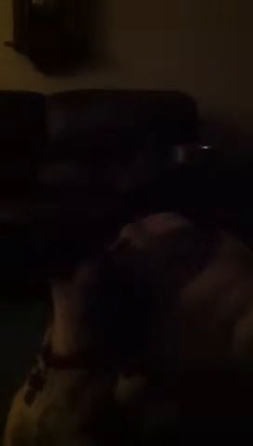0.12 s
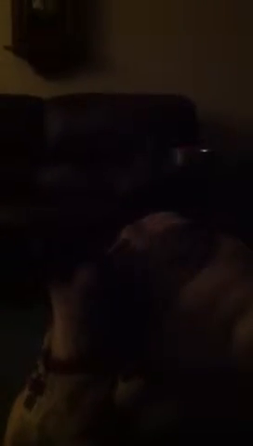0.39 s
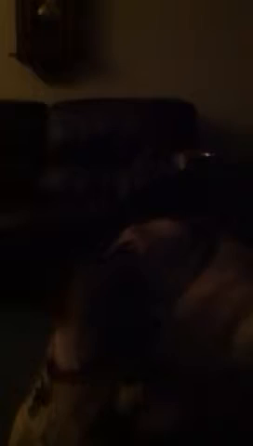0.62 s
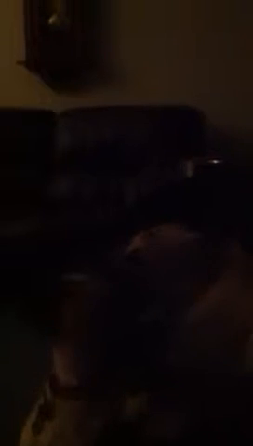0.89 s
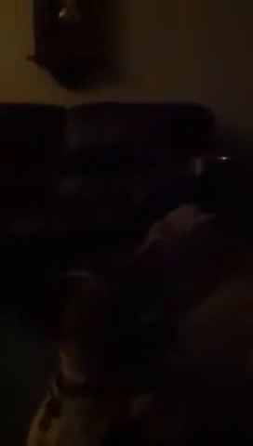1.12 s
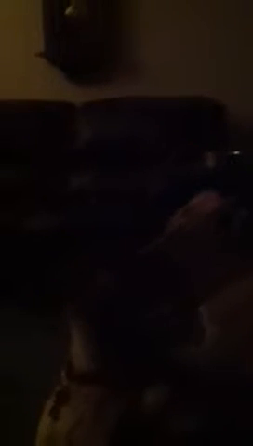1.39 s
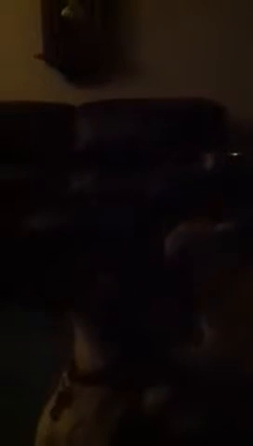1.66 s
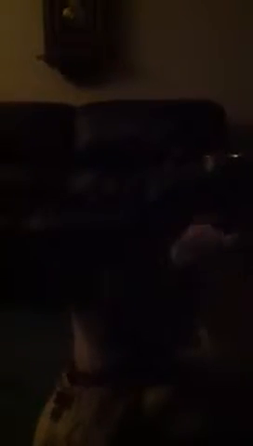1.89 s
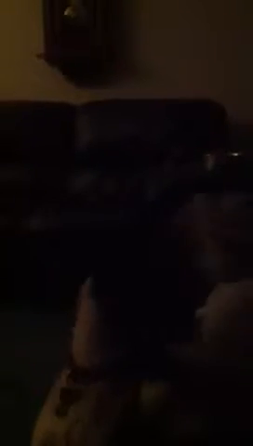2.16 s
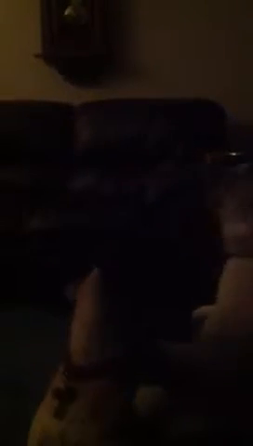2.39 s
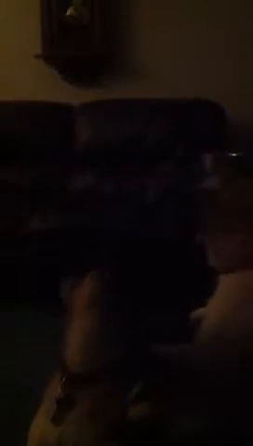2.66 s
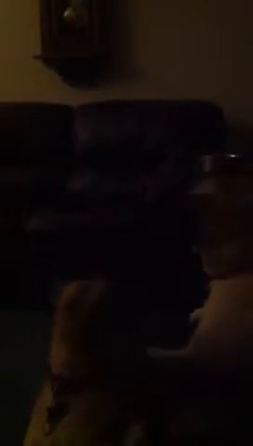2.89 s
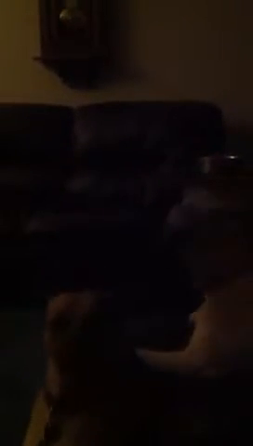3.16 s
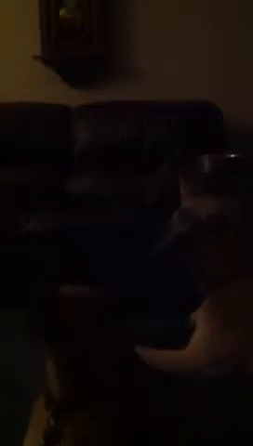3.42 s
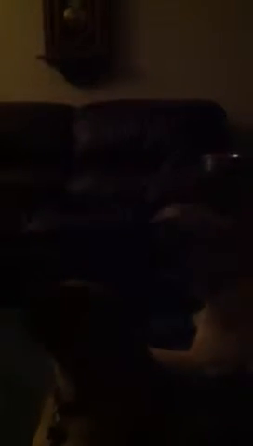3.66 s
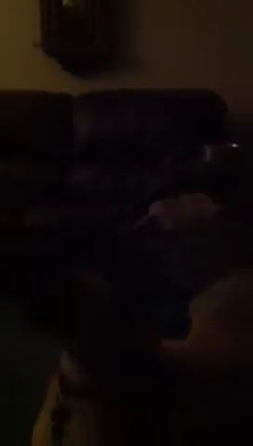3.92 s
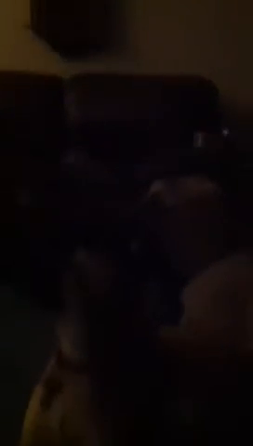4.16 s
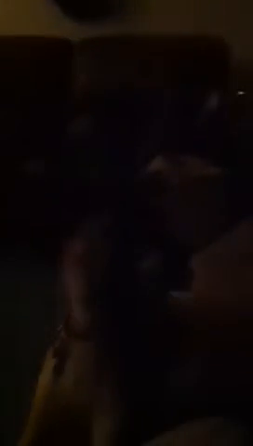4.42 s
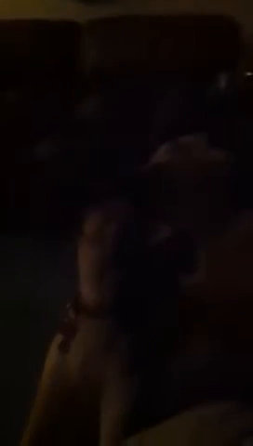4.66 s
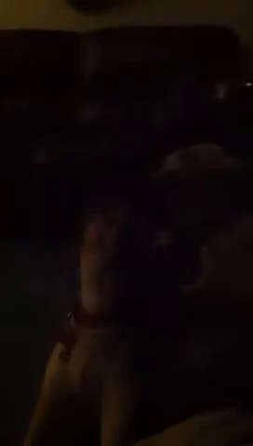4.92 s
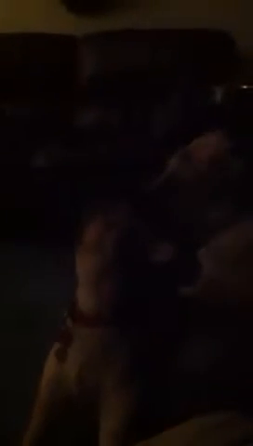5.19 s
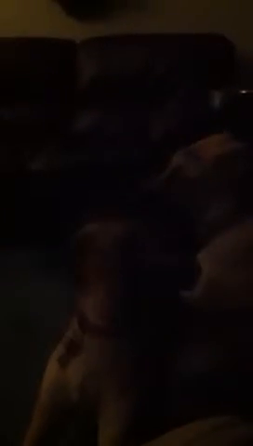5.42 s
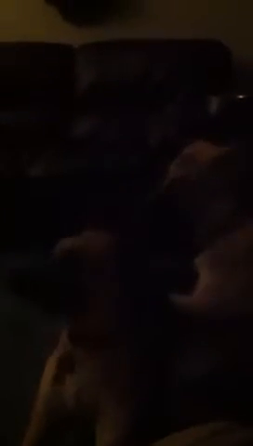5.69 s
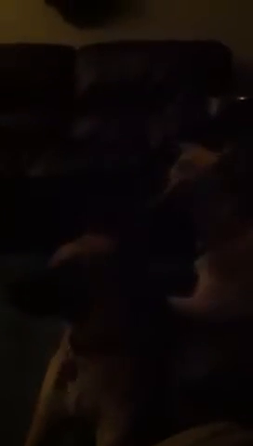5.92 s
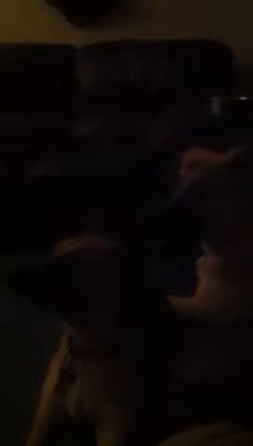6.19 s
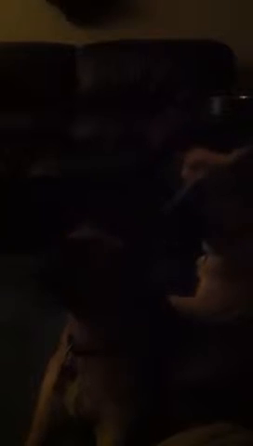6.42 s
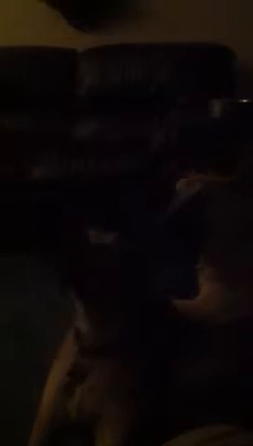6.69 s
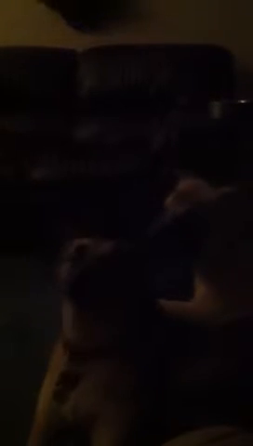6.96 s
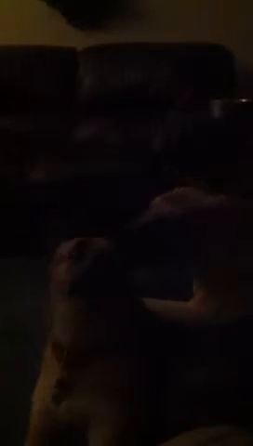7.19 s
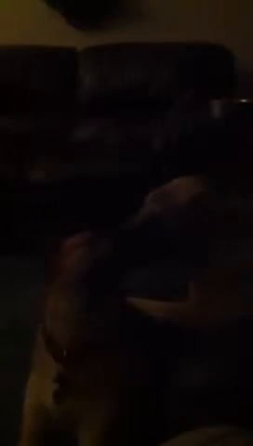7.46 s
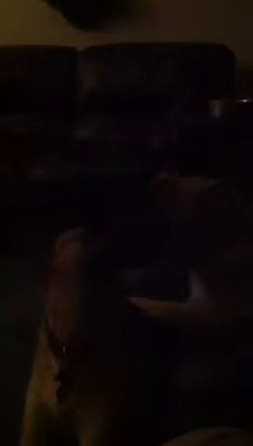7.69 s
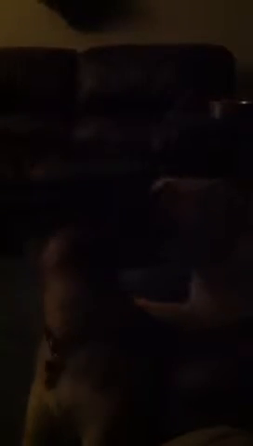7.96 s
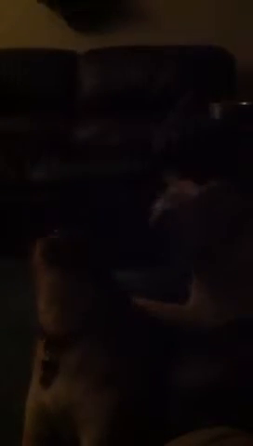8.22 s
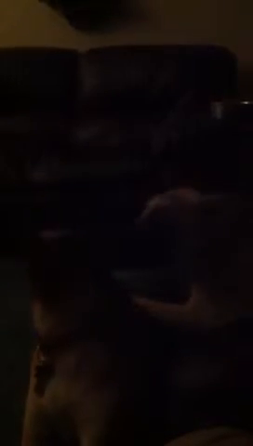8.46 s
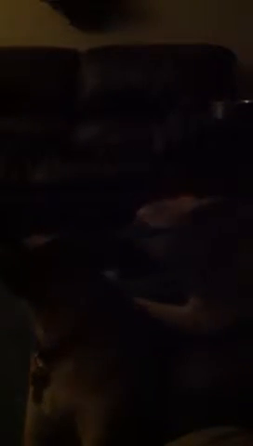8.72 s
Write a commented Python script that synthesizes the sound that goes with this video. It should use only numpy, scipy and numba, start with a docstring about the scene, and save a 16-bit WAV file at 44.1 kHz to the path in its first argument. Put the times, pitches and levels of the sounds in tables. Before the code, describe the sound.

Three dogs vocalise in a small furnished living room, a step or two from the microphone, with a short room ring, faint low house murmur and slight hiss. At 0 s a clear, steady howl is already sounding and slides down until about 1 s, with soft low moans beneath and a hoarse bark near 0.7 s; a faint dry tick comes around 0.9 s. From 1.35 to 2.5 s strong yelps scoop up and fall, interleaved with rough barks. From 3 to 4.9 s short, bright yelps and husky barks come in overlapping bursts, with small gaps. From 5.2 to 6.6 s yelps alternate with low sinking moans. At about 6.2 s a second, softer howl enters and wavers in loudness as it descends, fading by 8.5 s. Clipped barks punctuate it from 6.7 s, and yelps with moans return from 8.2 s to the end.

```python
"""Three dogs sing together in a small furnished living room, a step or two from the microphone.
One holds long falling howls, one yelps up and drops into low moans, one barks hoarsely among them.
Each voice is a stack of partials on an unsteady pitch, plus breath noise puffed once a cycle.
Fading noise makes the room's short ring; shaped noise makes a low house murmur, a tick and a hiss.
A limiter holds down the peaks."""
import sys
import numpy as np
from scipy import signal
from scipy.fft import rfft, irfft, next_fast_len
from scipy.io import wavfile
from scipy.ndimage import uniform_filter1d, minimum_filter1d
from numba import njit

SR = 44100
rng = np.random.default_rng(int(sys.argv[2]) if len(sys.argv) > 2 else 0)


def volts_from_db(level):
    """Convert decibel levels to linear amplitude ratios."""
    exponent = np.asarray(level, float) / 20
    return 10 ** exponent


def wav_out(sig):
    """Save sig, one row per channel (or a flat mono array), as 16-bit PCM at SR to the path in sys.argv[1]."""
    wavfile.write(sys.argv[1], SR, np.round(np.clip(np.atleast_2d(sig).T, -1, 1) * 32767).astype(np.int16))


N = 389838
T = np.arange(N) / SR  # time in seconds


def colour(points, hz):
    """Reads a table of f/Hz, level/dB at any frequency, along a logarithmic pitch scale."""
    f, db = np.transpose(points)
    return np.interp(np.log(np.maximum(hz, 1)), np.log(f), db)


def shaped(x, points):
    """Filters a sound by a table of f/Hz, level/dB."""
    size = next_fast_len(len(x))
    gain = volts_from_db(colour(points, np.fft.rfftfreq(size, 1 / SR)))
    return irfft(rfft(x, size) * gain, size)[:len(x)]


def walk(rate, size):
    """Random levels, rate of them a second, joined by straight lines."""
    count = int(size * rate / SR) + 2
    return np.interp(np.arange(size) * rate / SR, np.arange(count), rng.standard_normal(count))


@njit
def peak_hold(x, release):
    """Jumps to each peak at once and creeps back down."""
    held, level = np.empty(len(x)), 0.
    for i in range(len(x)):
        level = max(abs(x[i]), level * release)
        held[i] = level
    return held


def limiter(x):
    """Turns the sound down around its peaks, starting about a millisecond ahead of them."""
    ceiling, release_s = .7, 0.013  # ceiling as a share of full scale
    peaks = peak_hold(x, np.exp(-1 / (release_s * SR)))
    gain = np.minimum(1, ceiling / (peaks + 1e-9))
    return x * uniform_filter1d(minimum_filter1d(gain, size=65), size=33)


def hiss():
    """Steady faint hiss of the microphone: shaped noise."""
    x = shaped(rng.standard_normal(N), [(1500, -3.5), (4000, 3), (8000, 4.5), (12000, 1), (16000, -9.0)])
    return volts_from_db(-73.5) * x / x.std()


# how the house murmur spreads over pitch: (f/Hz, relative level/dB per Hz)
HOUSE_COLOUR = [(35, -69.5), (60, -27), (209, -17.5), (326, -22.5), (360, -4), (629, -20), (981, -17.5),
                (3050, -43), (3960, -69), (6710, -120)]


def house():
    """A faint low murmur of the house: shaped noise whose level flickers."""
    x = shaped(rng.standard_normal(N), HOUSE_COLOUR) * volts_from_db(2 * walk(41, N))
    return volts_from_db(-56) * x / x.std()


# the tick: (t/s, level/dB before its colouring)
TICK_EVENT = (.928, -38)


def tick():
    """One faint dry tick, perhaps a collar tag: a burst of noise that dies within milliseconds."""
    s, level_db = TICK_EVENT
    burst = rng.standard_normal(N) * np.exp(-np.maximum(T - s, 0) / 0.0016) * (T >= s)
    return volts_from_db(level_db) * shaped(burst, [(1200, -39), (3000, 13), (7000, -2), (16000, -21.0)])


# how long the room rings in each band: (middle f/Hz, time to fall by 60 dB t/s)
ROOM_RING = [(250, 0.57), (550, 0.39), (1200, 0.52), (2500, 0.38), (5000, 0.3), (10000, 0.55)]


def room(x, wet_db, delay_s=0.0019):
    """The direct sound plus its reflections: a noise tail in bands, each dying at its own pace."""
    t = T[:int(.9 * SR)]
    tail = 0
    for hz, t60 in ROOM_RING:
        sos = signal.butter(2, [hz / 1.5, hz * 1.5], "bandpass", fs=SR, output="sos")
        tail = tail + signal.sosfilt(sos, rng.standard_normal(len(t))) * 1000. ** (-t / t60)
    tail = tail * np.clip(t / delay_s - 1, 0, 1)  # silent up to the delay, full at twice the delay
    tail = tail / np.sqrt(np.sum(tail ** 2))
    return x + volts_from_db(wet_db) * signal.fftconvolve(x, tail)[:N]


# the largest share of a call that its rise may take: (a single number, no unit)
LONGEST_RISE_SHARE = .7


def arch(event, move, fade, mouth):
    """A call scoops up to its top pitch as it swells, holds, then slides to its last pitch as it fades."""
    start, length, top_hz, last_hz, db = event
    scoop, rise_s, attack_db, slide = move
    fade_db, open_db = fade
    t = np.linspace(0, length, num=int(length * 400) + 2)
    # a short call rises sooner and from less far below
    hurry = min(1, LONGEST_RISE_SHARE * length / rise_s)
    rise_s, scoop = hurry * rise_s, hurry * scoop
    missing = np.clip(1 - t / rise_s, 0, 1) ** 2
    turn_s = max(rise_s, length - abs(top_hz - last_hz) / slide - 1e-3)
    hz = np.interp(t, [turn_s, length], [top_hz, last_hz]) * (1 - scoop * missing)
    after = np.maximum(t - rise_s, 0)
    level_db = db + attack_db * missing + fade_db * after
    mouth_db = np.interp(start + t, *np.transpose(mouth)) + open_db * after
    return np.transpose([start + t, hz, level_db, mouth_db])


# colour of the air hissing past the teeth: (f/Hz, relative level/dB)
TEETH_AIR = [(2000, -27.5), (3300, -0.5), (4300, -8), (5600, 3.5), (8000, -4), (12000, -20), (16000, -24.5)]


def voice(call, jaw, throat, rough, halves, lead, breath_db, air_db, edge_s, waver_db, snap_db, wobble, ring):
    """One call: partials on a jittered pitch, each with its own shimmer, plus breath puffed once a cycle."""
    s, *columns = np.transpose(call)
    i0, i1 = int(s[0] * SR), min(int(s[-1] * SR), N)
    t, size = T[i0:i1], i1 - i0
    hz, level_db, open_db = (np.interp(t, s, c) for c in columns)
    most, rough, halves = rough.max(), rough[i0:i1], halves[i0:i1]

    # the jaw colours the three lowest partials; a wider mouth lifts those from the first lead one up
    low_db = [level_db + open_db * (k >= lead[0]) + colour(jaw, k * hz) for k in (1, 2, 3)]
    # the strongest lead partial, without the throat's colour, is the effort of the vocal folds
    effort_db = np.max([low_db[k - 1] - colour(throat, k * hz) for k in lead], axis=0)

    jitter = .16 * rough * walk(420, size) + wobble * walk(35, size)
    phase = 2 * np.pi * (rng.random() + np.cumsum(hz * (1 + jitter)) / SR)
    # every second cycle weaker: lines appear halfway between the upper partials
    limp = 1 + halves * np.cos(phase / 2)
    # folds that close cleanly snap shut harder and ring brighter
    snap = -snap_db * np.log10(rough / most) + np.interp(t, *np.transpose(ring))

    out = 0
    for k in range(1, int(15500 / hz.max())):
        if k <= 3:
            db = low_db[k - 1] + waver_db * np.sqrt(k) * walk(25, size)
        else:
            # the moving jaw and tongue let each upper partial swell and fade alone
            swell_db = min(2 * k - 6, 6) * walk(12, size)
            db = effort_db + snap * (k > 5) + colour(throat, k * hz) + swell_db
        shimmer = (1 + 1.36 * rough * walk(260, size)) * (limp if k > 1 else 1)
        out = out + np.sqrt(2) * volts_from_db(db) * shimmer * np.sin(k * phase - .4 * k * k)

    puff = rng.standard_normal(size) * (1 + np.cos(phase))
    puff = shaped(puff, [(200, -50), (500, 4.0)] + throat)
    # air hissing past the teeth is brighter than the voice
    air = shaped(rng.standard_normal(size) * (1 + np.cos(phase)), TEETH_AIR)
    # folds that close unevenly leak more air
    leak = np.sqrt(rough / most)
    breath = volts_from_db(breath_db) * puff / puff.std() + volts_from_db(air_db) * air / air.std()
    out = out + leak * volts_from_db(effort_db) * breath

    # soft edges, except where the scene itself begins or ends
    from_start = (t - s[0]) if i0 else 1
    to_end = (s[-1] - t) if i1 < N - 99 else 1
    return i0, i1, out * np.clip(np.minimum(from_start, to_end) / edge_s, 0, 1)


def dog(calls, *voicing, **more):
    """Adds up all the calls of one dog."""
    out = np.zeros(N)
    for call in calls:
        i0, i1, sound = voice(call, *voicing, **more)
        out[i0:i1] += sound
    return out


# barks: (start t/s, length t/s, top f/Hz, last f/Hz, level/dB before the jaw's colour)
BARK_CALLS = [(0.681, 0.13, 547.7, 507, -10), (1.552, 0.12, 569, 448, -14.5),
              (1.951, .12, 585, 481.5, -11.5), (2.442, 0.087, 638.4, 641.6, -10),
              (3.002, .12, 512.6, 507, -16), (3.566, .165, 525.7, 520, -11),
              (4.248, 0.085, 621.4, 670, -25.5), (4.354, .125, 579.4, 472.4, -19),
              (4.785, 0.11, 548.5, 497, -20), (6.673, 0.098, 713.7, 678, -12),
              (7.122, 0.085, 586.6, 492, -14.5), (7.7, 0.074, 652, 620, -10),
              (8.233, 0.044, 549.6, 522, -16), (8.508, 0.083, 552, 513.5, -17.5),
              (8.815, 0.064, 581, 610, -21)]
# where each bark's voice breaks: (t/s, added roughness 0-1, added strong-weak cycles 0-1)
VOICE_BREAKS = [(.72, .45, .4), (1.59, .4, .3), (1.99, .22, .3), (2.46, .06, .8), (3.02, .2, .2),
                (3.59, .35, .3), (4.25, .3, .2), (4.37, .3, .4), (4.81, .14, .2), (6.715, .1, .8),
                (7.15, .07, .3), (7.72, .05, .7), (8.25, .15, .2), (8.54, .25, .3), (8.82, .2, .2)]
# jaw and lip colour of the three lowest partials: (f/Hz, level/dB)
BARK_JAW_COLOUR = [(450, -12.5), (550, -4.5), (680, 2), (950, -6.5), (1100, -4), (1300, -11.5),
                   (1600, -12.5), (1900, -11), (2150, -13.5)]
# throat and mouth colour of the upper partials: (f/Hz, level/dB)
BARK_THROAT_COLOUR = [(1000, 5.5), (1700, -10), (2200, -7), (2800, -31.5), (3400, -43), (4100, -37.5),
                      (5400, -34), (7500, -43), (10000, -54.5), (16000, -59)]
# how a bark moves: (scoop from below 0-1, longest rise t/s, attack level/dB, closing slide Hz per s)
BARK_MOTION = (.15, .035, -26, 3500)
# how a bark changes after its rise: (fade dB per s, mouth opening dB per s)
BARK_DECAY = (-220, 156)
# how wide the mouth is held: (t/s, level/dB on the overtones)
BARK_OPENING = [(0.751, -5), (1.599, 4.5), (2.001, 1), (2.5, -3.5), (3.05, 4.5), (3.649, -3.5), (4.4, 5.5),
                (4.848, 5.5), (6.751, 5.5), (7.181, 4.5), (7.751, 3), (8.28, 5.5), (8.56, 3)]
# how brightly the partials above the fifth ring: (t/s, level/dB)
BARK_BRIGHTNESS = [(.7, -1.9), (2.5, -0.14), (4.8, -2.2), (6.7, -0.86), (7.2, -0.51), (7.75, -0.82),
                   (8.5, 1)]


def barker():
    """Hoarse barks: in each one the folds fall out of step, which roughens the voice."""
    rough, halves = np.full(N, .04), np.zeros(N)
    for s, more_rough, more_halves in VOICE_BREAKS:
        held = np.clip((T - s) / .012, 0, 1) * (T < s + .17)
        rough, halves = rough + more_rough * held, halves + more_halves * held
    calls = [arch(e, BARK_MOTION, BARK_DECAY, BARK_OPENING) for e in BARK_CALLS]
    return dog(calls, BARK_JAW_COLOUR, BARK_THROAT_COLOUR, rough, halves, (2, 3),
               breath_db=-0.5, air_db=-43.5, edge_s=0.0018, waver_db=3.5,
               snap_db=0, wobble=.009, ring=BARK_BRIGHTNESS)


# yelps: (start t/s, length t/s, top f/Hz, last f/Hz, level/dB before the jaw's colour)
YELP_CALLS = [(1.355, 0.2, 558.6, 494.7, -6), (1.69, 0.27, 563.2, 419, -8), (2.26, 0.25, 570.2, 468.6, -4),
              (2.98, 0.046, 619.3, 617, -4.5), (3.29, 0.13, 623.4, 643, -3.5),
              (3.583, 0.14, 639.4, 663, -6.5), (3.9, 0.21, 588.3, 497.4, -10),
              (4.259, 0.14, 596.7, 623, -6), (4.76, 0.057, 624, 630, -7), (5.247, 0.13, 610, 610, -3.5),
              (5.65, 0.14, 589, 563, -9), (6.052, 0.14, 586, 541.7, -5.5), (6.415, .22, 574.3, 443, -11),
              (8.235, 0.13, 614.3, 597, -14), (8.515, .14, 620, 578, -8.5)]
# softer moans: (start t/s, length t/s, first f/Hz, last f/Hz, level/dB before the jaw's colour)
MOAN_CALLS = [(0.0, 0.16, 430.6, 420, -20), (.105, .2, 500.6, 441, -22.5), (.308, .077, 428, 431, -15),
              (.388, 0.22, 480.4, 436.6, -23), (2.03, .24, 524, 559.3, -17), (3.417, .153, 456.5, 410, -19),
              (3.735, 0.18, 460.5, 462, -25.5), (5.397, 0.23, 452, 413, -28),
              (5.807, .245, 436.5, 367, -25.5), (6.197, .225, 462.2, 381.6, -22.5),
              (4.135, .115, 501, 427, -35.5), (6.637, .065, 452.3, 412, -29),
              (8.363, 0.14, 574, 521.6, -22.5), (8.656, 0.15, 601.3, 534, -21.5)]
# the clearest notes: (start t/s, end t/s)
CLEAR_NOTES = [(.1, .3), (.39, .68), (1.42, 1.5), (2.3, 2.46), (3.33, 3.52), (5.95, 6.06), (8.26, 8.42),
               (8.58, 8.75)]
# jaw and lip colour of the three lowest partials: (f/Hz, level/dB)
YELP_JAW_COLOUR = [(380, -4), (450, -6.5), (520, 0), (600, -4), (850, -4), (980, 1), (1150, -20),
                   (1300, -17), (1500, -8.5), (1750, -10), (1950, -16)]
# throat and mouth colour of the upper partials: (f/Hz, level/dB)
YELP_THROAT_COLOUR = [(1000, -5), (1800, 9.5), (2300, -8.5), (2800, -19.5), (3300, -47), (4300, -27),
                      (5600, -28), (7500, -33.5), (10000, -50), (16000, -56)]
# how each call moves: (scoop from below 0-1, longest rise t/s, attack level/dB, closing slide Hz per s)
YELP_MOTION = (.31, .09, -30, 1300)
MOAN_MOTION = (.02, .025, -14, 10)
# how each call changes after its rise: (fade dB per s, mouth opening dB per s)
YELP_DECAY = (-87, 30)
MOAN_DECAY = (-48.5, -11)
# how wide the mouth is held: (t/s, level/dB on the overtones)
YELP_OPENING = [(0, -22), (0.701, -11.5), (1.4, -2.5), (1.8, -5), (2.15, 0.5), (2.38, -3), (2.998, 3),
                (3.35, 1.5), (3.5, 0.5), (3.65, 4), (4.0, -0.5), (4.35, -1), (4.8, 3), (5.302, -1.5),
                (5.5, 5.5), (5.75, 3), (5.95, 3), (6.13, -1.5), (6.3, 7), (6.5, 0), (8.299, 4), (8.6, -0.5)]
# how brightly the partials above the fifth ring: (t/s, level/dB)
YELP_BRIGHTNESS = [(0, -2.5), (1.45, -3.5), (1.8, 6.5), (2.35, 1), (3.38, -1), (4.0, -0.5), (5.3, 0),
                   (5.75, 2.5), (6.0, -3), (6.5, 1), (8.3, 3), (8.7, 5)]


def yelper():
    """Yelps and moans from slightly hoarse folds, which close cleanly on a few clear notes."""
    rough = np.full(N, .12)
    for start, end in CLEAR_NOTES:
        rough[int(start * SR):int(end * SR)] = .015
    yelps = [arch(e, YELP_MOTION, YELP_DECAY, YELP_OPENING) for e in YELP_CALLS]
    moans = [arch(e, MOAN_MOTION, MOAN_DECAY, YELP_OPENING) for e in MOAN_CALLS]
    return dog(yelps + moans, YELP_JAW_COLOUR, YELP_THROAT_COLOUR, rough, np.zeros(N), (3,),
               breath_db=-10.5, air_db=-21.0, edge_s=0.0034, waver_db=2.5,
               snap_db=8, wobble=.006, ring=YELP_BRIGHTNESS)


# howls, one list each: (t/s, f/Hz, level/dB before the jaw's colour, mouth opening level/dB on overtones)
HOWL_CALLS = [
    [(0.0, 699.7, -10.5, 1.5), (0.04, 680, -11, -1), (0.1, 665, -9, 1), (0.17, 645, -13.5, 1.5),
     (0.3, 619.2, -12.5, -0.5), (0.4, 603, -9.5, -5), (0.52, 585, -14.5, -5.5), (0.62, 585.4, -10, -12.5),
     (0.68, 569, -17.5, -8.5), (0.86, 547, -29, -8), (0.93, 539.4, -20.5, -8.5), (1.03, 521, -31, -2.5)],
    [(6.17, 582.8, -28, 6), (6.25, 593, -29.5, 8), (6.35, 577, -30.5, 12), (6.42, 576.6, -14, 4),
     (6.56, 566, -27.5, -0.5), (6.66, 553, -23, 9), (6.85, 514, -32.5, 12.5), (6.97, 497, -33.5, 13.5),
     (7.1, 479.4, -21, -1), (7.32, 466, -21, -3.5), (7.45, 456, -26, 3.5), (7.57, 444, -17.5, -8),
     (7.68, 438, -18.5, -6), (7.9, 427, -24.5, -12), (8.2, 411.8, -28, 0.5), (8.35, 405, -34, 0),
     (8.47, 393, -41, -5)],
]
# jaw and lip colour of the three lowest partials: (f/Hz, level/dB)
HOWL_JAW_COLOUR = [(400, 2), (700, 0), (850, -18.5), (1100, -10.5), (1350, -13.5), (1500, -6),
                   (1750, -23.5), (2100, -40)]
# throat and mouth colour of the upper partials: (f/Hz, level/dB)
HOWL_THROAT_COLOUR = [(1000, 7.5), (1700, 11.5), (2050, 6), (2350, -18), (2650, -11), (3200, -40.5),
                      (4100, -21.5), (4700, -43), (5600, -27.5), (8000, -40), (12000, -32.5), (16000, -50)]
# how brightly the partials above the fifth ring: (t/s, level/dB)
HOWL_BRIGHTNESS = [(0, -2.5), (.3, -1), (.5, -6), (1.0, -5.5), (6.2, 7.5), (6.55, 0.5), (6.9, -5), (7.1, 0),
                   (7.4, -2), (7.9, 1.5), (8.4, 1)]


def howler():
    """Long falling howls in a clear voice: the folds stay almost even throughout."""
    rough = np.full(N, .02)
    return dog(HOWL_CALLS, HOWL_JAW_COLOUR, HOWL_THROAT_COLOUR, rough, np.zeros(N), (2, 3),
               breath_db=-24, air_db=-20.0, edge_s=0.031, waver_db=3.0,
               snap_db=0, wobble=.001, ring=HOWL_BRIGHTNESS)


def scene():
    """Each dog stands elsewhere, so each has its own share of the room."""
    dogs = room(howler(), wet_db=-20.5) + room(yelper(), wet_db=-6) + room(barker(), wet_db=-2)
    return (dogs + tick() + house())[None]


def top_cut(x):
    """Nothing passes above the cut-off."""
    return signal.sosfilt(signal.butter(12, 15800, fs=SR, output="sos"), x)


def record(dry):
    """The microphone adds hiss and cuts the bass below 120 Hz; a limiter then holds the peaks."""
    bass_cut = signal.butter(2, 120, "highpass", fs=SR, output="sos")
    x = signal.sosfilt(bass_cut, dry[0] + hiss())
    return top_cut(limiter(x)[None])


dry = scene()
out = record(dry)
wav_out(out)
```